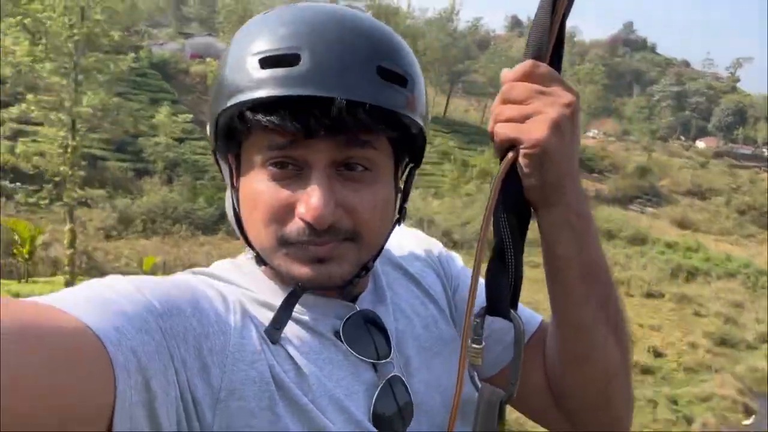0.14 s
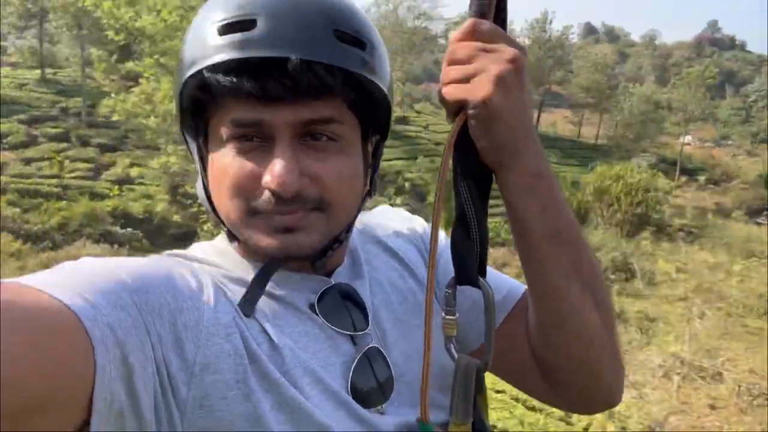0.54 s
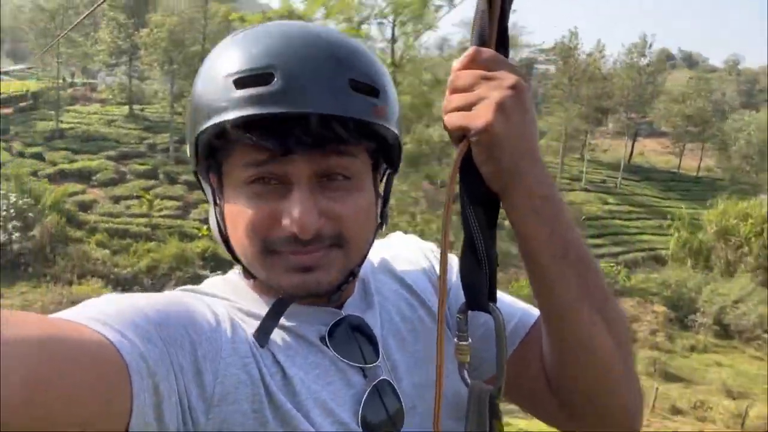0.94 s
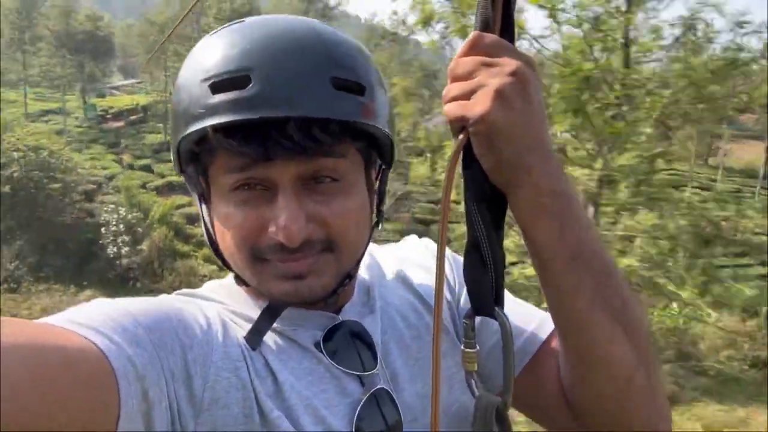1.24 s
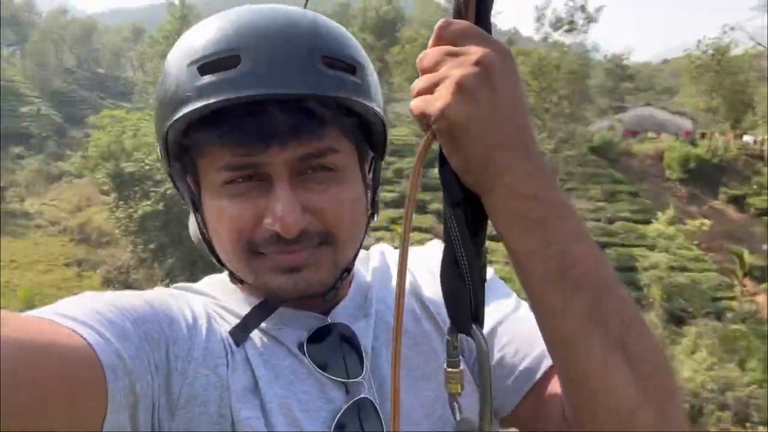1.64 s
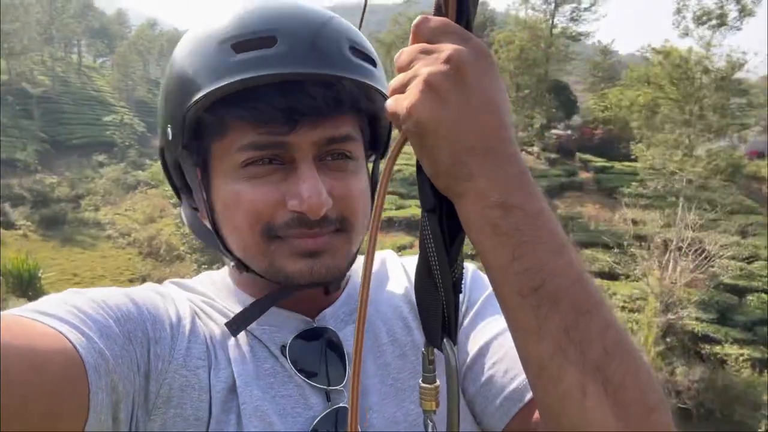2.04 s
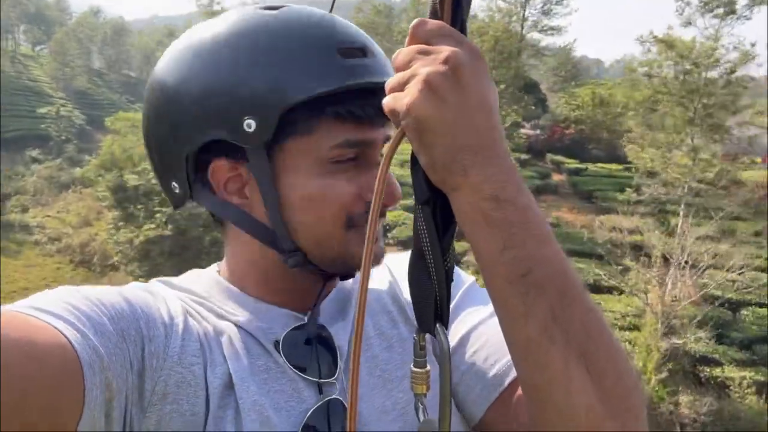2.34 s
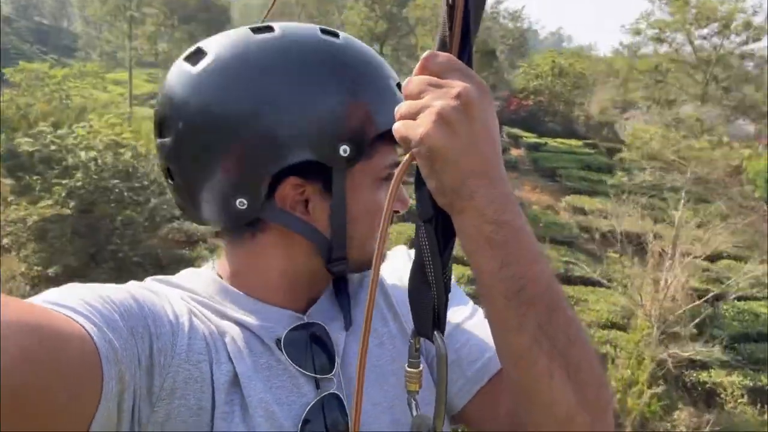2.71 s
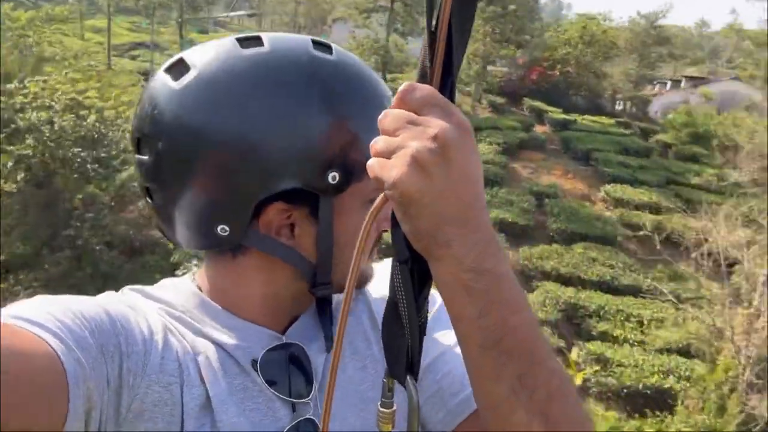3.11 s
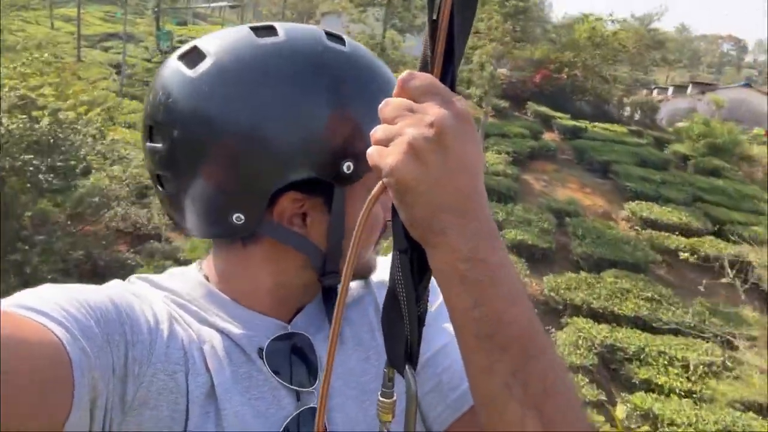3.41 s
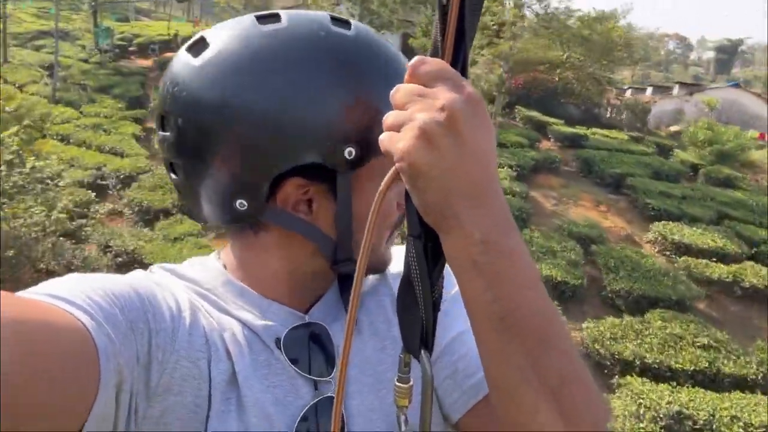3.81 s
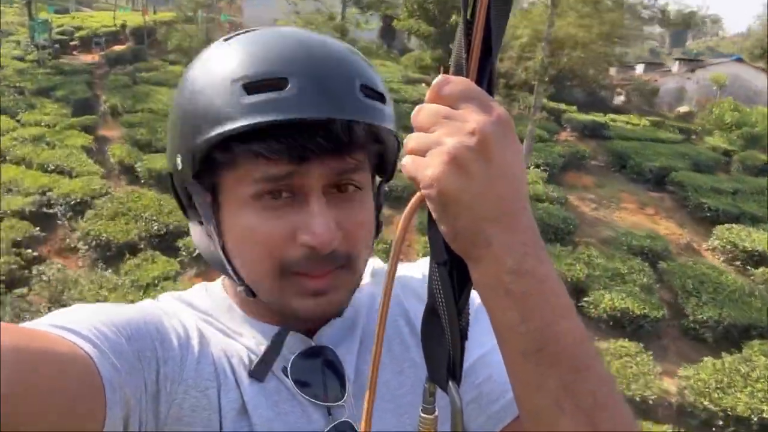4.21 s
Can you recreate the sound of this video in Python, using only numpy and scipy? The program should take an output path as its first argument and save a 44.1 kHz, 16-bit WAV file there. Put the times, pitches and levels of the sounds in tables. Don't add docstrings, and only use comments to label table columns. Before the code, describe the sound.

A zipline trolley whirs along a steel cable with a slowly falling whine and bright metallic hiss while wind thumps and pops on the phone.

```python
import sys
import numpy as np
from scipy import signal
from scipy.fft import rfft, irfft, next_fast_len
from scipy.io import wavfile
from scipy.ndimage import uniform_filter1d, map_coordinates

SR = 44100
rng = np.random.default_rng(int(sys.argv[2]) if len(sys.argv) > 2 else 0)


def dump_mix(stems):
    frames = np.atleast_2d(stems).T
    limited = np.clip(frames, -1, 1)
    pcm = np.round(limited * 32767).astype(np.int16)
    wavfile.write(sys.argv[1], SR, pcm)


def nominal_scale(level):
    x = np.asarray(level, float) / 20
    return 10 ** x


N = 192055
FRAME = 512


# (frequency [Hz], width [Hz], level in each of four poses [dB])
STEEL_RINGS = [(1550, 280, -10.5, -13, -14.5, -11), (2070, 304, -4.5, -4.5, -6.5, -3.5),
               (2497, 224, -6.5, -3.5, -7.5, -3.5), (2950, 380, -24, -10.5, -6, -3.5),
               (3560, 144, -25, -11, -11, -2), (3940, 240, -2, -6.5, -11, -18),
               (4690, 560, -11, -24, -9.5, -7.5), (5486, 540, -3.5, 0.5, -1.5, -4),
               (6125, 364, -15, -3, 0.5, 0.5), (6830, 600, 0, -7, -5.5, -4.5), (8100, 860, 0, -5, -4, -1.5),
               (9200, 1270, -5.5, -2, -1, -3), (10030, 460, 1.5, -2.5, -0.5, 0),
               (10820, 460, -13, -0.5, -0.5, -1), (11840, 490, -2.5, -14, 0, 0),
               (12200, 800, -2, -2, -4.5, -2), (13430, 320, -8, -5, -9, -6),
               (14850, 1200, -7.5, -8.5, -7, -5.5)]
# (time [s], level [dB])
ROLLING_HISS = [
    (0.0, -28.5),
    (0.34, -29.5),
    (2.63, -30.5),
    (4.03, -29),
    (4.29, -28),
    (4.35, -29),
]


def trolley():
    f, t = grid()
    power = 0
    for hz, width_hz, *pose_db in STEEL_RINGS:
        power = power + nominal_scale(2 * (pose_db @ poses(t))) / (1 + ((f - hz) / width_hz) ** 2) ** 2
    hiss_db = np.interp(t, *np.transpose(ROLLING_HISS)) + 8.0 + 0.5 * patches(4000, 0.03)
    ring = np.sqrt(power) * nominal_scale(hiss_db)
    tones = whine()
    direct = ring * patchy(depth_db=1.49) + frames(tones)
    scattered = ring * patchy(depth_db=0.57) + frames(np.roll(tones, 137))
    return ports(direct, scattered)


# (time [s], rate [twists/s])
TWIST_RATE = [
    (0, 137.3),
    (.6, 135.8),
    (1.3, 133.3),
    (2, 131),
    (3, 128),
    (3.8, 125),
    (4.35, 123),
]
WHINE_MULTIPLES = [6, 11, 12, 13, 17, 18, 19, 23, 24, 25, 29, 30, 31, 35, 36]
WHINE_LEVELS = [(-58, -54, -46, -52), (-61.5, -58, -59.5, -58), (-47.5, -52.5, -55.5, -51.5),
                (-48, -50, -50.5, -71), (-46.5, -51, -57.5, -54), (-46.5, -52, -52, -53),
                (-47, -47.5, -52, -42.5), (-56, -49, -65, -52.5), (-54, -57, -47, -44.5),
                (-69, -67, -85, -45), (-61, -59, -51, -50), (-44, -56, -63, -47.5), (-50, -63, -56, -65),
                (-57, -56, -46, -71), (-50, -47, -56, -49)]
# (frequency [Hz], width [Hz], level [dB])
WHEEL_RINGS = [
    (1482, 30, 6),
    (1640, 30, -4),
    (2240, 60, -6),
    (3720, 50, 2),
]


def whine():
    turns = np.cumsum(curves(TWIST_RATE)[0]) / SR
    turns = turns + 0.012 * wobble(14) + 0.003 * wobble(60)
    levels_db = np.array(WHINE_LEVELS) @ poses(np.arange(N) / SR)
    tones = np.zeros(N)
    for multiple, db in zip(WHINE_MULTIPLES, levels_db):
        loudness = nominal_scale(db + 3 + wobble(6) + 2 * wobble(35))
        tones += loudness * np.sin(2 * np.pi * (multiple * turns + rng.random()))

    def wheel(f):
        return 1 + sum(nominal_scale(db) / (1 + ((f - hz) / width_hz) ** 2) for hz, width_hz, db in WHEEL_RINGS)

    return filtered(tones, wheel)


# (time [s], length [s])
POSE_TURNS = [
    (0.525, 0.19),
    (1.43, 0.5),
    (2.843, 1),
]


def poses(t):
    passed = [np.clip((t - s) / length + 0.5, 0, 1) for s, length in POSE_TURNS]
    return -np.diff([np.ones(len(t)), *passed, np.zeros(len(t))], axis=0)


# (frequency [Hz], phase lead in each of four poses [rad])
PORT_LEAD = [(1500, 4.5, 5.5, 5.5, 5.5), (2366, 4, 4.5, 5.0, 4.5), (3560, 2, 3.5, 3.2, 3),
             (3730, 1.5, 4, 4, 4.5), (4150, 2, 2.5, 3, 1.5), (4840, 0.8, 3, 3.5, 2.4),
             (5390, -0.9, 1.8, 2.5, 1.6), (6030, -0.5, 1.4, 2.1, 1.3), (6540, -2.5, 0.4, 2.2, 0.7),
             (7110, -3, -4.5, -4, -2.5), (8160, -3, -2.5, -3, -2.4), (9930, -2, -1.9, -1.6, -1.74),
             (11260, 1.7, -0.9, -1.6, -.9), (12400, -1, -1, 0, -0.8)]
# (frequency [Hz], likeness in each of four poses [share])
PORT_LIKENESS = [(890, 0.22, .6, 0.95, 0.91), (1490, 0.6, 0.44, 0.23, 0.45), (2350, 0.75, 0.89, 0.73, 0.71),
                 (3140, .98, .93, .78, 0.72), (3650, 0.92, 0.86, 0.67, 0.6), (4300, 0.43, 0.94, 0.52, 0.76),
                 (4860, 0.52, 0.41, 0.93, 0.43), (5370, 0.9, 0.53, .72, 0.44), (6600, .7, .42, 0.36, 0.63),
                 (7500, 0.65, .9, 0.41, 0.74), (8650, 0.98, 0.94, 0.73, 0.93), (9900, 1, 0.96, 0.83, 1),
                 (11000, .68, .64, .68, 0.55), (12500, 0.96, 0.95, 0.83, 1)]
# (frequency [Hz], difference in each of four poses [dB])
PORT_BALANCE = [(900, 0.0, 0.0, -1.0, 0.0), (1500, 1.0, 1.0, 1.0, 2.0), (2400, 0.0, 0.0, 0.0, 2.0),
                (3300, 0.0, 0.0, 0.0, 0.0), (4200, -1.0, 0.0, 0.0, 0.0), (4700, 0.0, -1.0, 0.0, 0.0),
                (5300, 0.0, -2.0, -1.0, -1.0), (6000, 0.0, -1.0, 0.0, 0.0), (6600, 2.0, -1.0, 1.0, 1.0),
                (7200, 4.0, 1.0, 1.0, 2.0), (8500, 1.0, 2.0, 1.0, 2.0), (10000, 0.0, 1.0, 0.0, 1.0),
                (11200, 0.0, 0.0, 0.0, 0.0), (12500, 0.0, 0.0, 0.0, 0.0)]
# (time [s], extra lead at 4 kHz [rad], scattered sound [dB])
HAND_SWAY = [(0, -0.88, -2.5), (.45, .3, -1.5), (.75, 0.41, -6.5), (1.3, -.15, 2.5), (2, -0.76, -6),
             (2.5, 0.2, 0.5), (2.9, -0.027, 0.5), (3.6, -0.017, 0.5), (4.35, 0.26, -4.5)]
SHAKE_RAD, SHAKE_DB, SHAKE_RATE = 0.33, -1.85, 3.61


def ports(direct, scattered):
    hz, t = grid()
    tables = (PORT_LEAD, PORT_LIKENESS, PORT_BALANCE)
    lead, alike, pan_db = (np.transpose(along(table, hz[:, 0])) @ poses(t) for table in tables)
    s, *sway = np.transpose(HAND_SWAY)
    lead_4k, scatter_db = (np.interp(t, s, c) for c in sway)
    lead_8k, own_4k, own_8k = (np.interp(t, np.arange(N) / SR, wobble(SHAKE_RATE)) for _ in range(3))
    upper = np.clip(np.log2(hz / 4000 + 1e-9), 0, 1)
    lower = np.clip((hz - 3200) / 800, 0, 1)
    lead = lead + (1 - upper) * lower * lead_4k + upper * SHAKE_RAD * lead_8k
    lead = lead + 0.15 * patches(400, 0.066)
    own_db = SHAKE_DB * ((1 - upper) * own_4k + upper * own_8k)
    own_db = own_db + (0.24 + 0.88 * upper) * scatter_db - 1.0 - 1.24 * upper
    own_db = own_db + 2.1 * patches(400, 0.058)
    unlike = np.sqrt(1 - np.clip(alike, 0, 1) ** 2)
    own = np.clip(unlike * nominal_scale(own_db), 0, 1)
    right = direct * np.exp(-1j * lead) * np.sqrt(1 - own ** 2) + scattered * own
    return unframe(np.array([direct * nominal_scale(pan_db / 2), right * nominal_scale(-pan_db / 2)]))


# (time [s], strength [dB], large eddies over small [dB])
WIND_STRENGTH = [(0, -43, 6.5), (.1, -43, 3), (.24, -61, 16), (.42, -42, -1), (.58, -47, 6.5),
                 (.72, -35.5, -2.5), (.9, -55, 9.5), (1.14, -53, 1), (1.3, -49.5, 3.5), (1.67, -46.5, 0.5),
                 (1.74, -51, -2.5), (1.91, -37, -1.5), (2.2, -39, 4.5), (2.93, -40.5, 1), (3.03, -51.5, 7),
                 (3.27, -43, 3), (4.12, -49, 4.5), (4.35, -40, -4)]
# (time [s], level [dB])
PORT_WIND = [
    (0, -5.5),
    (.9, -7.5),
    (1, -10),
    (1.4, -15.5),
    (4.35, -21),
]
# (frequency [Hz], level [dB per Hz])
THUMP_SPECTRUM = [(15, -44), (30, -20), (50, -2.5), (75, -0.5), (120, -9.5), (170, -20.5), (300, -34)]
# (frequency [Hz], level [dB per Hz])
BUFFET_SPECTRUM = [(70, -25), (120, -3), (170, -1), (300, -6.5), (450, -15), (700, -17.5), (1200, -37)]
# (frequency [Hz], level [dB per Hz])
FLUTTER_SPECTRUM = [(250, -4.5), (400, -2.5), (550, -3), (900, -2), (1300, -7.5), (1600, -15), (2500, -50)]
FLUTTER_DB, FLUTTER_GROWS = 1.5, 0.84
FLUTTER_SPLIT = 0.15


def wind():
    strength_db, large_db = curves(WIND_STRENGTH)
    mean_db = strength_db.mean()
    wake = wakes()
    flutter_db = mean_db + FLUTTER_GROWS * (strength_db - mean_db) + FLUTTER_DB
    flutter_db = flutter_db - FLUTTER_SPLIT * large_db + 3.6 * wobble(9)
    flutter = nominal_scale(flutter_db) + 0.76 * wake
    eddy = wobble(90) + 0.79 * wobble(24.99)
    buffet_gain = nominal_scale(strength_db + 1.05 * wobble(12)) + wake
    buffet = buffet_gain * gusts(BUFFET_SPECTRUM, 2.62 * eddy)
    shared = buffet + flutter * nominal_scale(-4.5) * gusts(FLUTTER_SPECTRUM, 3.7 * eddy) + pops()
    own = flutter * nominal_scale(7.0) * gusts(FLUTTER_SPECTRUM, 4.9 * eddy) + 1.6 * shared
    bright_own = filtered(own, lambda hz: 1 / (1 + (380 / (hz + 1)) ** 6))
    side = nominal_scale(curves(PORT_WIND)[0]) * bright_own
    thump_gain = nominal_scale(strength_db + large_db + 1.6 * wobble(7)) + 0.78 * wake
    mid = shared + thump_gain * gusts(THUMP_SPECTRUM, 1.4 * eddy + 2.2 * wobble(20))
    return np.array([mid - side, mid + side])


def gusts(spectrum, lumps_db):
    lumps = nominal_scale(lumps_db) * rng.standard_normal(N)
    return unit(filtered(lumps, lambda hz: nominal_scale(along(spectrum, hz)[0]) * sweep(hz, lag=0.003055)))


def sweep(hz, lag):
    return np.exp(-2j * np.pi * lag / np.log(2) * hz * (np.log(1200 / (hz + 1)) + 1))


# (time [s], peak level [dB], thud level [dB], pitch [Hz])
STRONG_EDDIES = [(.087, -36.5, 10, 316), (0.102, -29.5, -20, 350), (.342, -32.5, 10.5, 368),
                 (0.414, -27.5, 7.5, 316), (0.464, -32.5, 0, 310), (.668, -30, -3, 318),
                 (0.805, -33, 2, 308), (.858, -34, -2, 345), (1.215, -35, 2, 378), (1.295, -29, 0, 414),
                 (1.469, -26.5, -7, 427), (1.881, -27, -2, 750), (2.019, -31.5, -6, 460),
                 (2.068, -30, -18, 613), (2.118, -28.5, 6, 533), (2.206, -31, -17, 795),
                 (2.38, -32.5, 4, 704), (2.432, -29, -1, 335), (2.527, -29, -3, 450),
                 (2.576, -24, -20, 520), (2.632, -30.5, -12, 370), (2.694, -28.5, -18, 498),
                 (2.764, -31, -22, 750), (2.904, -27.5, -20, 342), (2.949, -22, 2, 356),
                 (3.066, -31, 5, 402), (3.256, -28.5, -20, 370), (3.504, -32.5, -4, 335),
                 (3.726, -31.5, -6, 724), (3.916, -33.5, 7, 595)]
GUARD_S, SPIKE_BARE_DB, SPIKE_GUARDED_DB = 1, 7.5, -7


def pops():
    t = np.arange(SR // 20) / SR
    out = np.zeros(N + SR)

    def puff(peak_s):
        return t / peak_s * np.exp(1 - t / peak_s)

    def tone(cycles):
        return np.sin(2 * np.pi * cycles)

    eddies = [*STRONG_EDDIES, *small_eddies()]
    chances = rng.random((len(eddies), 4))
    for (s, db, thud_db, hz), (chirp_phase, thud_phase, spike_phase, luck) in zip(eddies, chances):
        spike_db = SPIKE_BARE_DB if s < GUARD_S else SPIKE_GUARDED_DB
        spike_db = spike_db + 9 * (luck - 0.5)
        chirp = tone(hz * 0.00732 * np.log(1 + t / 0.003555) + chirp_phase) * puff(0.0025)
        spike = tone(1150 * t + spike_phase) * puff(0.0011) ** 2
        thud = tone(110 * t + thud_phase) * puff(0.0053) ** 2
        pop = chirp + nominal_scale(spike_db - 7.5) * spike + nominal_scale(thud_db - 3.5) * thud
        out[round(s * SR):][:len(t)] += nominal_scale(db) * pop
    return out[:N]


WEAK_POPS = [.044, .392, .438, .533, .597, .618, 0.773, 1.171, 1.348, 1.438, 1.92, 1.958, 2.25, 2.289,
             2.605, 2.795, 2.93, 2.992, 3.225, 3.281, 3.317, 3.39, 3.419, 3.543, 3.584, 3.872, 3.985, 4.17,
             4.203]
SMALL_DB, SMALL_SPREAD_DB, SMALL_THUD_DB, SMALL_HZ = -37, 2.5, 0, 450


def small_eddies():
    size, thud, pitch = rng.standard_normal((len(WEAK_POPS), 3)).T
    peak_db = SMALL_DB + SMALL_SPREAD_DB * size
    thud_db = SMALL_THUD_DB + 4 * thud
    return np.transpose([WEAK_POPS, peak_db, thud_db, SMALL_HZ * np.exp(0.25 * pitch)])


WAKE_DB, WAKE_S = -15.5, 0.0087


def wakes():
    starts = np.zeros(N)
    u = np.arange(SR // 5) / SR / WAKE_S
    for s, db, thud_db, _ in STRONG_EDDIES:
        starts[round(s * SR)] = nominal_scale(db + thud_db + WAKE_DB)
    return np.abs(signal.fftconvolve(starts, u * np.exp(1 - u))[:N])


def unit(x):
    return x / np.sqrt(np.mean(x ** 2) + 1e-20)


def along(points, hz):
    f, *cols = np.transpose(points)
    return [np.interp(np.log(hz + 1), np.log(f + 1), c) for c in cols]


def curves(rows):
    s, *cols = np.transpose(rows)
    return [np.interp(np.arange(N) / SR, s, c) for c in cols]


def wobble(rate):
    knots = rng.standard_normal(int(N * rate / SR) + 4)
    return map_coordinates(knots, [np.arange(N) * rate / SR])


def filtered(x, response):
    m = next_fast_len(N + 8192)
    return irfft(rfft(x, m) * response(np.fft.rfftfreq(m, 1 / SR)), m)[..., :N]


def patchy(depth_db):
    return frames(rng.standard_normal(N)) * nominal_scale(depth_db * patches(450, 0.07))


def patches(size_hz, size_s):
    hz, t = grid()
    field = rng.standard_normal((len(hz), len(t)))
    field = uniform_filter1d(field, size=int(size_hz * FRAME / SR) + 1, axis=0)
    return unit(uniform_filter1d(field, size=int(size_s * SR / FRAME * 2) + 1, axis=1))


def frames(x):
    return signal.stft(np.pad(x, FRAME), SR, nperseg=FRAME)[2]


def unframe(z):
    return signal.istft(z, SR, nperseg=FRAME)[1][..., FRAME:FRAME + N]


def grid():
    count = frames(np.zeros(N)).shape[1]
    return np.fft.rfftfreq(FRAME, 1 / SR)[:, None], (np.arange(count) * FRAME / 2 - FRAME) / SR


def scene():
    return trolley() + wind()


def roll_off(x):
    return signal.sosfilt(signal.butter(12, 17070, fs=SR, output="sos"), x)


# (time [s], frequency [Hz])
MERGE_BELOW = [
    (0, 294),
    (.9, 326),
    (1.4, 696),
    (4.35, 765),
]
TOP_HZ = 15800


def record(dry):
    hz, t = grid()
    mid = filtered(dry.mean(axis=0), lambda f: f < TOP_HZ)
    merge_hz = np.interp(t, *np.transpose(MERGE_BELOW))
    apart = (hz < 12700) / (1 + (merge_hz / (hz + 1)) ** 12)
    side = unframe(frames(dry[0] - dry[1]) / 2 * apart)
    return roll_off(np.array([mid + side, mid - side]))


dry = scene()
out = record(dry)
dump_mix(out)
```